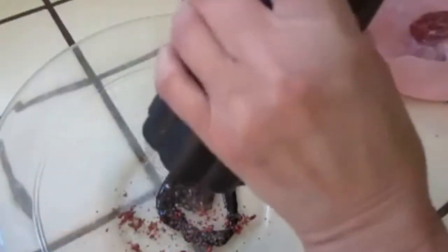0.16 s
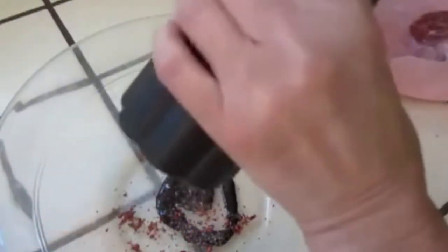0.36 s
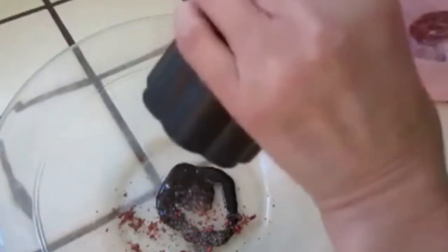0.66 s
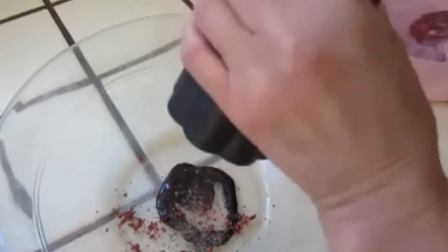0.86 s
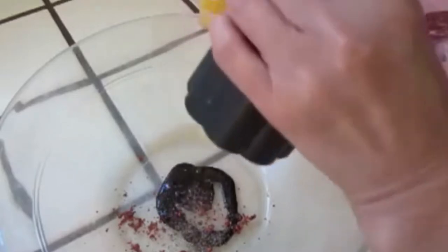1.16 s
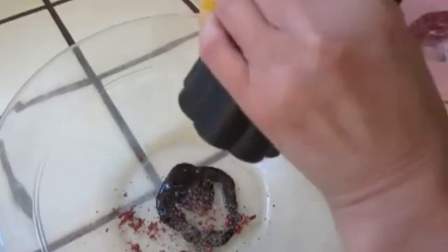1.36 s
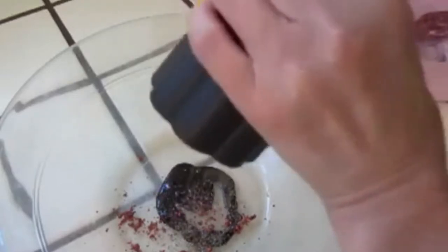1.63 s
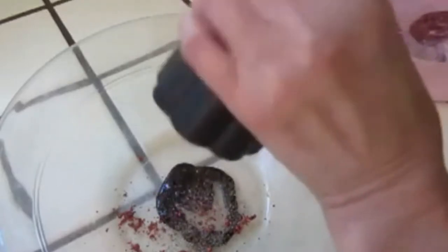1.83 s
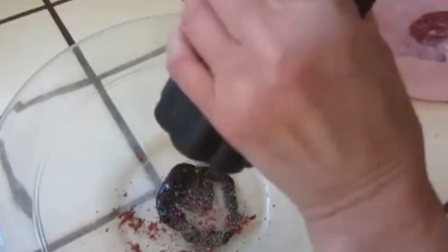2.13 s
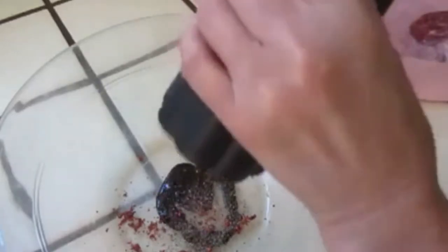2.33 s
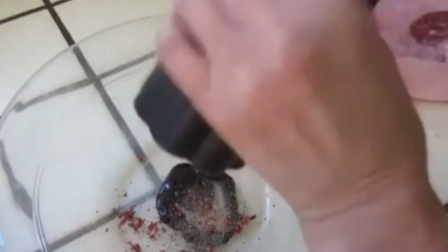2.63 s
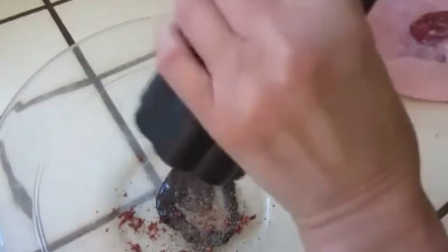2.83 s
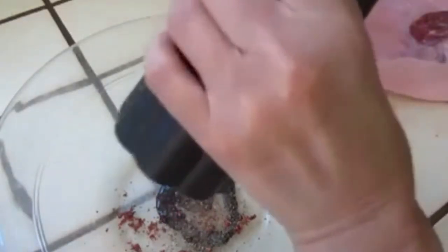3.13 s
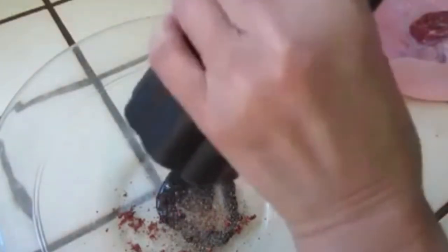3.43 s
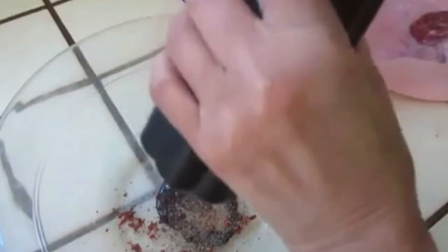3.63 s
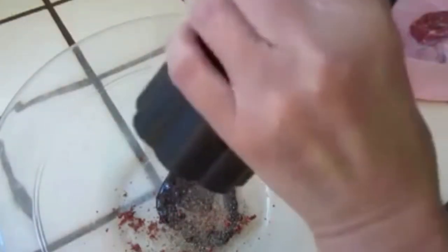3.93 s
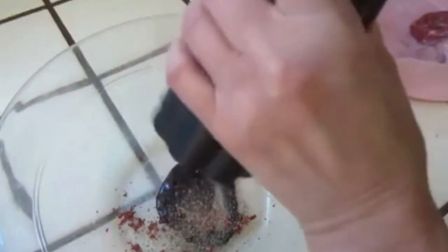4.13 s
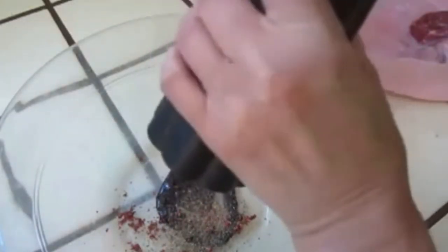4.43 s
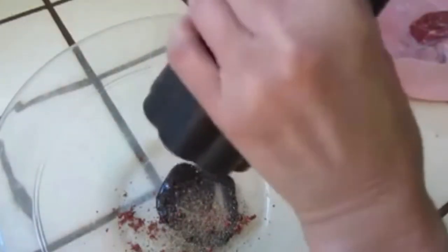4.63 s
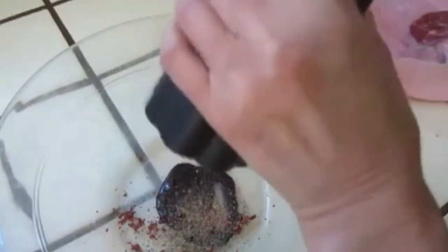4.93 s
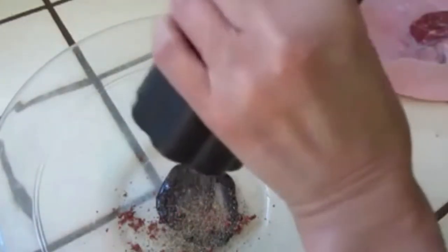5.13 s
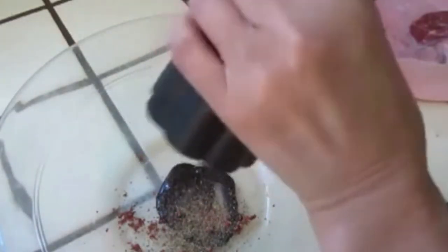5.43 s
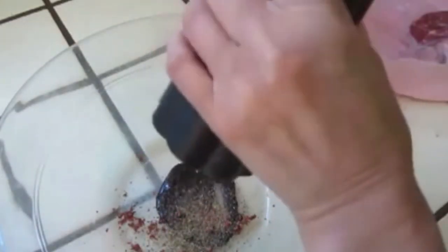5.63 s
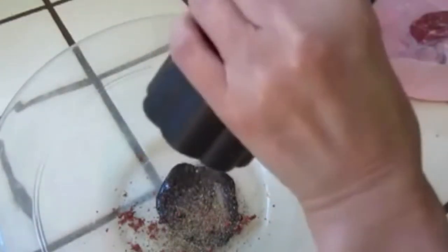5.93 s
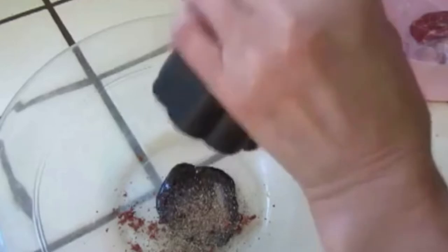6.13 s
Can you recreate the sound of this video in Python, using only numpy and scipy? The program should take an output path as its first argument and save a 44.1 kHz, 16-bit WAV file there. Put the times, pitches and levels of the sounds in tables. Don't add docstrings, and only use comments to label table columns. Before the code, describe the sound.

A pepper mill is twisted by hand right beside the microphone, about two and a half short crunches per second. Each twist is a dense, gritty rasp of roughly a tenth of a second, hollow in the middle and crisp on top, often split by a loud crack of a breaking corn. Between twists come tiny ticks, soft grip rustle and fine grounds pattering. A small kitchen adds a short faint tail and low hum.

```python
import sys
import numpy as np
from scipy import signal
from scipy.io import wavfile
from scipy.ndimage import uniform_filter1d

SR = 44100
rng = np.random.default_rng(int(sys.argv[2]) if len(sys.argv) > 2 else 0)


def output_pcm(signal):
    pcm = np.clip(np.atleast_2d(signal).T, -1, 1) * 32767
    wavfile.write(sys.argv[1], SR, np.round(pcm).astype(np.int16))


def gain_from_db(level_db):
    decades = np.asarray(level_db, float) / 20
    return 10 ** decades


N = 277036

# f/Hz, width/Hz, level/dB
BODY = [(367, 70, -15.5), (469, 83, -8), (607, 98, -7.5), (760, 84, -5), (949, 124, 2), (1087, 135, -0.5),
        (1170, 130, -1), (1456, 150, -5), (1590, 76, -6)]
# f/Hz, width/Hz, level/dB
GRINDER = [(1889, 137, -6.5), (2297, 217, -4.5), (2500, 510, 2.5), (2920, 770, 6), (3496, 162, 0),
           (3845, 215, -3.5), (4280, 390, -6), (4960, 335, -8.5), (5395, 116, -7.5), (6060, 400, -7),
           (6600, 156, -17)]
# f/Hz, width/Hz, level/dB
SNAP = [(7120, 2140, 3.5), (8370, 600, -3), (9350, 240, -9), (10400, 1170, 2), (11770, 220, -19),
        (12570, 300, -16.5), (12700, 1340, 0)]
# bite t/s, hardest push t/s, release t/s, body grit level/dB, grinder grit level/dB
STROKES = [(-.06, 0.038, 0.077, -26, -34.5), (0.333, 0.412, 0.45, -17, -26), (.666, 0.748, 0.74, -16, -24),
           (1.17, 1.218, 1.265, -23.5, -22), (1.59, 1.615, 1.69, -17.5, -21),
           (1.961, 1.998, 2.046, -19, -24.5), (2.353, 2.385, 2.46, -19, -22),
           (2.769, 2.782, 2.856, -20, -26.5), (3.117, 3.191, 3.246, -22.5, -29.5),
           (3.495, 3.535, 3.552, -21, -21.5), (3.895, 3.979, 3.997, -24.5, -26.5),
           (4.272, 4.342, 4.352, -16.5, -23), (4.67, 4.758, 4.8, -19, -25.5),
           (5.064, 5.128, 5.166, -18, -24), (5.466, 5.503, 5.595, -21.5, -26),
           (5.848, 5.91, 5.965, -18, -23), (6.23, 6.267, 7.2, -20.5, -21.5)]
# t/s, peak level/dB, body share level/dB, snap share level/dB
BREAKS = [(0.6756, -7, 2, -12), (0.725, -6.5, -24, -15), (1.1253, -2.5, -5, -8), (1.134, 4.3, -25, -7),
          (1.177, -0.5, -14, -4.5), (1.2087, -8, 2, 7.5), (1.5764, -8.5, -2, -17), (1.9902, -8, -11, -19),
          (2.008, -11, 5, -22), (2.0467, -10.5, 5, -21), (2.3595, -0.5, -13, -23), (2.372, -8, -3, -17),
          (2.3912, -5.5, -19, -25), (2.42, -8, -0.5, -24), (2.777, -5.5, -4, -25), (3.1499, -8, -13, -5),
          (3.5215, -22, -4, -14), (3.5353, 3, -8, -22), (3.5641, 2, -14, -7.5), (3.9023, -1, -6, -10),
          (3.9286, -3, -18, -22), (3.9867, -7.5, 4, -2), (4.2829, -14.5, 5.5, -21), (4.3398, -8.5, -1, -3),
          (4.359, 0.5, -16, 2), (4.362, -6.5, -9, -12), (4.3794, -12.5, -1.5, -25), (4.7305, -18.5, 0, -12),
          (5.8435, -16, 3, -17), (5.9284, -10.5, -16, -16)]
# t/s, peak level/dB, snap share level/dB
TICKS = [(0.0991, -32, 15.5), (.1093, -30.5, -1), (0.165, -31.5, -12), (.191, -35.5, -12),
         (0.8545, -23.5, -2), (1.1067, -33, -17), (4.6354, -38, 0), (1.521, -33.5, -5), (1.9155, -32, -8),
         (2.2764, -31, -11), (2.2979, -28, -14), (2.6952, -29, -6), (2.7148, -24, -16), (2.879, -33, -11),
         (3.0082, -29.5, 1), (3.068, -29.5, 0), (3.2849, -25.5, 2.5), (3.459, -26.5, -2), (3.823, -33, -15),
         (3.8585, -40, 10.5), (4.237, -27, -1), (4.2647, -25, -6), (4.8454, -21.5, -8), (5.0554, -28, 9),
         (5.2417, -22, 2), (5.435, -29.5, -2), (5.805, -34, 6), (5.8183, -26.5, -3), (6.181, -27.5, 0),
         (6.2064, -19, -5)]


def rms_one(x):
    return x / np.sqrt(np.mean(x ** 2) + 1e-20)


def resonance(x, hz, width_hz):
    r, w = np.exp(-np.pi * width_hz / SR), 2 * np.pi * hz / SR
    return signal.lfilter([0, np.sin(w)], [1, -2 * r * np.cos(w), r * r], x + 1e-18)


def ringing(x, hz, t60_s):
    return resonance(x, hz, np.log(1000) / np.pi / t60_s)


def filtered(x, order, hz, kind):
    return signal.sosfilt(signal.butter(order, hz, kind, fs=SR, output="sos"), x)


def drift(rate_hz):
    r = np.exp(-2 * np.pi * rate_hz / SR)
    return rms_one(signal.lfilter([1], [1, -2 * r, r * r], rng.standard_normal(N + SR))[SR:])


def effort(tables, column):
    gain = np.zeros(N)
    for rows in map(np.array, tables):
        start, end = rows[0, 0], rows[-1, 0]
        i = np.arange(max(round(start * SR), 0), min(round(end * SR), N))
        gain[i] += gain_from_db(np.interp(i / SR, rows[:, 0], rows[:, column]))
    return uniform_filter1d(gain, size=201)


def loads():
    # bite t/s, release t/s, body level/dB, grinder level/dB
    catches = [(0.086, 0.132, -44, -40), (0.315, 0.364, -28, -35.5), (0.745, 0.781, -42, -31),
               (1.113, 1.15, -26.5, -21.5), (1.143, 1.191, -22.5, -22), (3.087, 3.14, -29, -34),
               (5.826, 5.866, -21.5, -27), (5.448, 5.49, -21.5, -23), (1.26, 1.315, -28.5, -33),
               (1.561, 1.604, -19.5, -22), (1.64, 1.725, -21, -27), (4.775, 4.825, -27, -35),
               (1.939, 1.977, -16, -26.5), (2.306, 2.355, -25, -28.5), (2.45, 2.525, -31, -35),
               (2.74, 2.803, -20.5, -28), (2.726, 2.76, -30, -36), (4.258, 4.29, -40, -40),
               (3.474, 3.51, -29, -31), (3.545, 3.608, -32, -31), (3.86, 3.902, -30, -30),
               (4.352, 4.397, -26, -23), (4.687, 4.735, -45, -28), (6.198, 6.236, -34.5, -57)]
    body_shape_db = (-20.5, -7.5, -13, -31)
    grinder_shape_db = (-14.5, -6, -16, -31)
    bite_s, slip_s = 0.011, 0.028
    small = [(s, s + bite_s, end, body_db, grinder_db) for s, end, body_db, grinder_db in catches]
    stages = np.array([body_shape_db, grinder_shape_db])
    stages = np.insert(stages, 2, 0, axis=1)
    tables = []
    for bite, push, end, *db in list(STROKES) + small:
        bitten = min(bite + bite_s, push) - 1e-4
        s = np.maximum.accumulate([bite, bitten, push, end, end + slip_s])
        tables.append(np.vstack([s, stages + np.array(db)[:, None]]).T)
    return tables


def strike(clicks, modes, scatter, seating):
    out = 0
    for k, (hz, width_hz, db) in enumerate(modes):
        strength = np.roll(scatter, 997 * k)
        balance = gain_from_db(db + np.roll(seating, 23011 * k))
        out = out + resonance(clicks * strength * balance, hz, width_hz)
    return rms_one(out)


def grit():
    brittle_db = [-4, -6.5, -9, -9, -9, -6.5, -7.5, -9.5, -5.5, -7, -10.5, -9, -9.5, -8, -10, -8, -10]
    grains_per_s, grain_spread_db, clump_db, clump_hz = 3000, 3, 2.5, 45
    seat_drift_db, seat_drift_hz = 3, 8.6
    sizes = gain_from_db(grain_spread_db * np.minimum(rng.exponential(1, N), 4))
    clumps = gain_from_db(clump_db * drift(clump_hz))
    chance = rng.random(N)
    clicks = sizes * (chance < grains_per_s / SR) * clumps
    splinters = np.sqrt(sizes) * (chance < 3 * grains_per_s / SR) * clumps
    scatter = rng.standard_normal(N)
    seating = seat_drift_db * drift(seat_drift_hz)
    push_s = [row[1] for row in STROKES]
    brittle = gain_from_db(np.interp(np.arange(N) / SR, push_s, brittle_db))
    body = gain_from_db(-2.0) * strike(clicks, BODY, scatter, seating)
    hard = strike(clicks, GRINDER, scatter, seating) + brittle * strike(splinters, SNAP, scatter, seating)
    spells = loads()
    return effort(spells, column=1) * body + effort(spells, column=2) * hard


def jamming():
    jam_s, jam_db, whole_corn_db = 0.008, -4, -12.5
    t, hush_db = np.arange(N) / SR, np.zeros(N)
    for s, peak_db, *_ in BREAKS:
        if peak_db > whole_corn_db:
            near = slice(max(round(s * SR) - 1500, 0), round(s * SR))
            hush_db[near] += jam_db * np.exp((t[near] - s) / jam_s)
    return gain_from_db(hush_db)


def failures():
    # t/s, peak level/dB, body share level/dB
    chip_rows = [(.0422, -24, 13), (.343, -12, -15), (.406, -17, 2), (.745, -18, 3), (1.2668, -13, 2.5),
                 (1.2867, -27, 3), (1.946, -15, 10), (2.323, -25, 9), (2.7545, -15.5, 7.5),
                 (3.1024, -21.5, 8.5), (3.181, -16, -18), (3.1863, -16, -19), (3.4919, -19, -3),
                 (3.5696, -16, 2), (3.8729, -22, 4), (3.8813, -21, -8), (3.968, -17, 1.1),
                 (4.2975, -23, -17), (4.316, -12, 6), (4.7095, -21, 2), (5.069, -27, 2.1),
                 (5.0789, -16.5, -5), (5.124, -19, 1.1), (5.1756, -25, 9), (5.457, -13.5, 2),
                 (5.467, -17, -17), (5.5054, -17, 11.5), (5.593, -22, -14), (6.2205, -17, 1),
                 (6.2595, -31, -16)]
    chip_snap_db, tick_body_db = -7.5, -8.5
    chips = [(s, db, body_db, chip_snap_db) for s, db, body_db in chip_rows]
    ticks = [(s, db, tick_body_db, snap_db) for s, db, snap_db in TICKS]
    return list(BREAKS) + chips + ticks


def cracks():
    burst_s, burst_db, mode_scatter_db = 0.0018, -14, 2.5
    s, peak_db, body_db, snap_db = np.transpose(failures())
    span = np.arange(400)
    lasting = burst_s * SR * gain_from_db(peak_db / 5)[:, None]
    bursts = gain_from_db(burst_db) * rng.laplace(size=(len(s), 400)) * np.exp(-span / lasting) / 3
    bursts[:, 0] = -1
    seat = rng.standard_normal((len(s), 30))
    at = np.round(s * SR).astype(int)[:, None] + span
    parts = ((BODY, peak_db + body_db - 10), (GRINDER, peak_db - 11.5), (SNAP, peak_db + snap_db - 10))
    out, k = np.zeros(N), 0
    for modes, level_db in parts:
        for hz, width_hz, db in modes:
            gain = gain_from_db(level_db + db + mode_scatter_db * seat[:, k])
            force = np.zeros(N + 500)
            np.add.at(force, at, bursts * gain[:, None])
            out += (-1) ** k * resonance(force[:N], hz, width_hz)
            k += 1
    return out


def heft():
    hz, width_hz, level_db = 137, 65, -28
    shudder = resonance(rng.standard_normal(N), hz, width_hz)
    shudder = resonance(shudder, hz, width_hz)
    return gain_from_db(level_db) * effort(loads(), column=1) * rms_one(shudder)


def pauses():
    # start t/s, end t/s, trickling grounds level/dB, shifting grip level/dB
    rests = [(.12, 0.314, -59, -51.5), (0.466, 0.672, -43, -50.5), (0.777, 1.1, -42.5, -50),
             (1.315, 1.563, -50, -53.5), (1.732, 1.94, -43.5, -51), (2.073, 2.305, -48, -52.5),
             (2.508, 2.737, -51, -54), (2.88, 3.089, -47, -54), (3.235, 3.476, -49, -52),
             (3.615, 3.86, -55, -57), (4.036, 4.265, -51.5, -56.5), (4.42, 4.667, -59, -57),
             (4.82, 5.076, -55, -55.5), (5.195, 5.441, -49, -55.5), (5.582, 5.822, -47, -52.5),
             (5.987, 6.196, -47, -53)]
    trickle_fall_db_per_s, regrip_s, regrip_trickle_db = 97, 0.042, -45
    grip_loose_db, grip_clench_db = -3.5, 7.5
    shaken_db, shaken_s, shaken_fade_db, still_db = -22, 0.064, -28, -120
    tables = []
    for s, end, fall_db, grip_db in rests:
        regrip = end - regrip_s
        thinned_db = fall_db - trickle_fall_db_per_s * (regrip - s)
        tables.append([(s, fall_db, grip_db + grip_loose_db),
                       (regrip, thinned_db, grip_db),
                       (end, regrip_trickle_db, grip_db + grip_clench_db)])
    for s, db, _ in TICKS:
        loose_db = db + shaken_db
        tables.append([(s, loose_db, still_db), (s + shaken_s, loose_db + shaken_fade_db, still_db)])
    return tables


def settling():
    trickle_per_s, trickle_band_hz = 5700, [2160, 9040]
    grip_band_hz, grip_lump_db = [70, 442], 2.5
    specks = rng.laplace(size=N) * (rng.random(N) < trickle_per_s / SR) * gain_from_db(2.5 * drift(12.4))
    specks = rms_one(filtered(specks, 1, trickle_band_hz, "band"))
    grip = rng.standard_normal(N) * gain_from_db(grip_lump_db * drift(30))
    grip = rms_one(filtered(grip, 2, grip_band_hz, "band"))
    spells = pauses()
    return gain_from_db(-3.5) * effort(spells, column=1) * specks + gain_from_db(-1.0) * effort(spells, column=2) * grip


def bowl():
    # f/Hz, level/dB, t60/s
    glass = [(4931, -5, .1), (7560, -8, .2), (7540, -5, .2), (9087, -3, .14), (9765, -8, .2),
             (11600, -8, .15), (11500, -8, .2), (13280, -4, .08), (14440, -8, .15)]
    # t/s, peak level/dB
    pings = [
        (1.8277, -37),
        (2.1774, -48),
        (4.158, -58),
        (4.1806, -50),
    ]
    s, peak_db = np.transpose(pings)
    spot = rng.standard_normal((len(s), 14))
    out = 0
    for k, (hz, db, t60_s) in enumerate(glass):
        taps = np.zeros(N)
        taps[(s * SR).astype(int)] = gain_from_db(peak_db + db - 12.5 + 3 * spot[:, k])
        out = out + ringing(taps, hz, t60_s)
    return out


def sympathy(mill):
    # f/Hz, level/dB, t60/s
    low_glass = [(1910, -5, 0.33), (2320, -7, 0.84), (2750, -8, 0.37), (3680, -3, 0.26), (3817, -9, 0.22)]
    level_db, longest_ring_s = -61.5, 0.56
    rings = sum(gain_from_db(db) * ringing(mill, hz, min(t60_s, longest_ring_s)) for hz, db, t60_s in low_glass)
    return gain_from_db(level_db) * rings


def kitchen(x):
    t60_s, treble_loss_hz, first_walls_s = 0.35, 8560, 0.011
    t = np.arange(SR) / SR
    noise = rng.standard_normal(SR)
    low = filtered(noise, 1, treble_loss_hz, "low")
    tail = low * gain_from_db(-60 * t / t60_s) + (noise - low) * gain_from_db(-90 * t / t60_s)
    tail = tail * np.clip(t / first_walls_s, 0, 1)
    return signal.fftconvolve(x, tail / np.sqrt(np.sum(tail ** 2)))[:N]


def air():
    # f/Hz, level per Hz/dB
    hush = [(12, -33), (20, 3.5), (58, 10.5), (238, -10), (298, -20), (478, -17), (834, 0), (1340, -27),
            (1540, -7.5), (2150, -14.5), (3540, -18), (13100, -24), (15500, -39)]
    hush_db, patch_db, patch_hz = -53, 3, 7.3
    hum_hz, hum_width_hz, hum_db = 59, 16, -62
    edges = 20 * 2 ** np.arange(0, 9.7, .5)
    white = rng.standard_normal((2, N + SR))
    hz, db = np.transpose(hush)
    patches = patch_db * drift(patch_hz)
    out = 0
    for k, (low, high) in enumerate(zip(edges, edges[1:])):
        band = filtered(white[k % 2], 2, [low, high], "band")[SR:]
        band_db = np.interp(np.log(low * high) / 2, np.log(hz), db)
        out = out + band * gain_from_db(band_db + np.roll(patches, 13001 * k))
    hum = resonance(rng.standard_normal(N + SR), hum_hz, hum_width_hz)[SR:]
    return gain_from_db(hush_db) * rms_one(out) + gain_from_db(hum_db) * rms_one(hum)


def scene():
    mill_low_hz, kitchen_db = 233, -15
    mill = filtered(jamming() * grit() + cracks(), 3, mill_low_hz, "high")
    near = mill + heft() + settling() + bowl() + sympathy(mill)
    return np.tile(near + gain_from_db(kitchen_db) * kitchen(mill) + air(), (2, 1))


def blanked_treble(x):
    blanks = [
        2.997,
        3.275,
        4.228,
        5.044,
        5.229,
        6.199,
    ]
    blank_s, from_hz = 0.004, 3500
    t = np.arange(N) / SR
    treble = signal.sosfiltfilt(signal.butter(4, from_hz, "high", fs=SR, output="sos"), x)
    return x - treble * sum(np.exp(-((t - s) / blank_s) ** 4) for s in blanks)


def smeared_treble(x):
    share, from_hz, width_hz = 0.15, 8900, 700
    hz, t, cells = signal.stft(x, SR, nperseg=2048, noverlap=1024)
    band = (hz // width_hz).astype(int)
    level = np.abs(cells[0]).mean(axis=0)
    chance = np.repeat(rng.random((64, len(t))), 2, axis=1)
    chosen = chance[band % 64, :len(t)] < share
    patch = chosen * (level > np.median(level)) * (hz > from_hz)[:, None]
    flipped = np.stack([cells[0], cells[1] * (1 - 2 * patch)])
    return signal.istft(flipped, SR, nperseg=2048, noverlap=1024)[1][:, :N]


def band_limit(x):
    return signal.sosfilt(signal.butter(12, 15700, fs=SR, output="sos"), x)


def record(dry):
    squeeze, knee_db, release_db_per_s, mic_top_hz = 0.07, -35, 41, 15500
    level_db = 10 * np.log10(uniform_filter1d(dry[0] ** 2, size=441) + 1e-12)
    fall = release_db_per_s * np.arange(N) / SR
    held_db = np.maximum.accumulate(level_db + fall) - fall
    duck_db = -squeeze * (np.maximum(held_db, knee_db) + 19)
    x = dry * gain_from_db(uniform_filter1d(duck_db, size=441))
    x = signal.sosfilt(signal.cheby2(12, 45, mic_top_hz, fs=SR, output="sos"), x)
    x = 2.205 * np.tanh(x / 2.093)
    mix = smeared_treble(blanked_treble(x))
    return band_limit(mix)


dry = scene()
out = record(dry)
output_pcm(out)
```